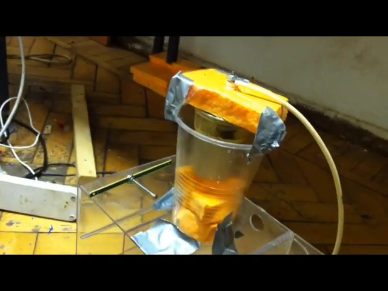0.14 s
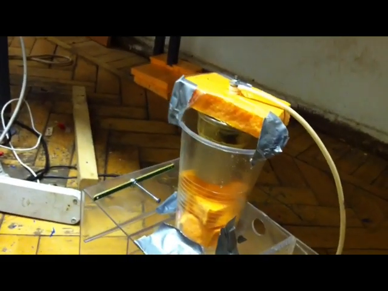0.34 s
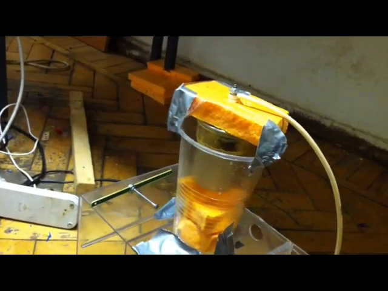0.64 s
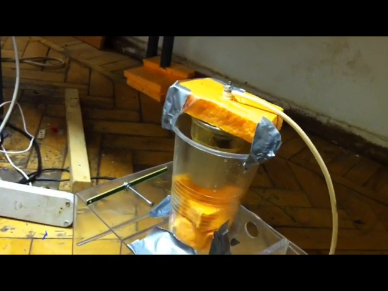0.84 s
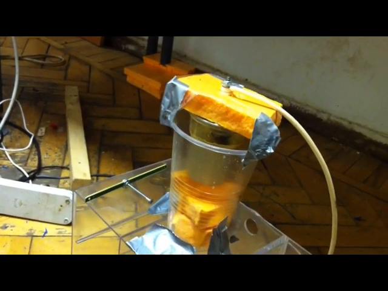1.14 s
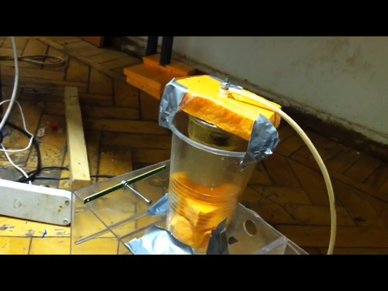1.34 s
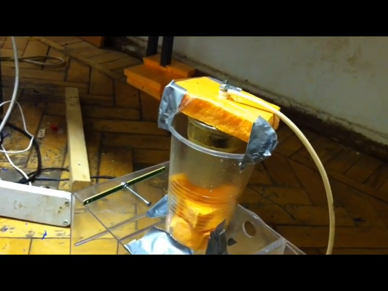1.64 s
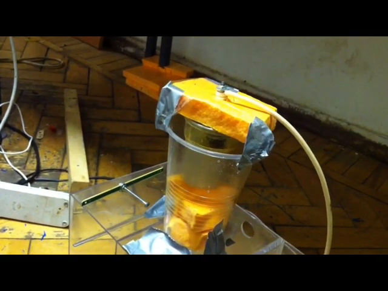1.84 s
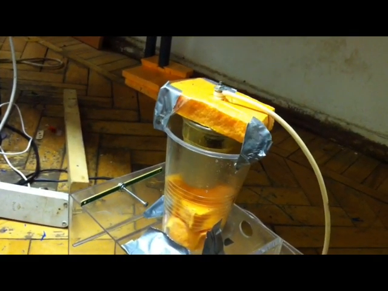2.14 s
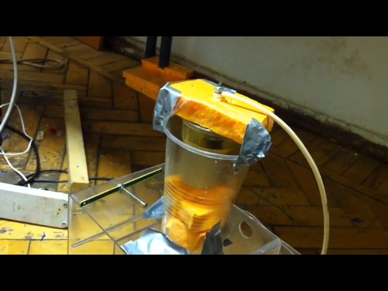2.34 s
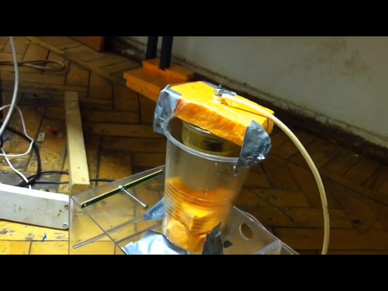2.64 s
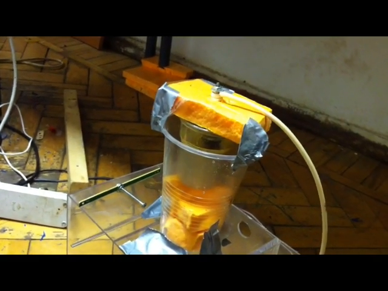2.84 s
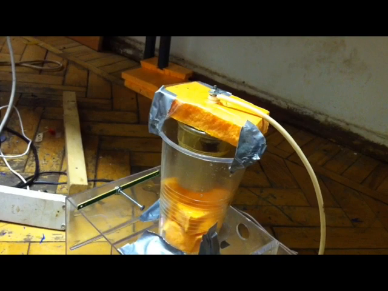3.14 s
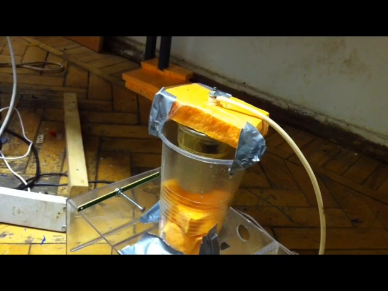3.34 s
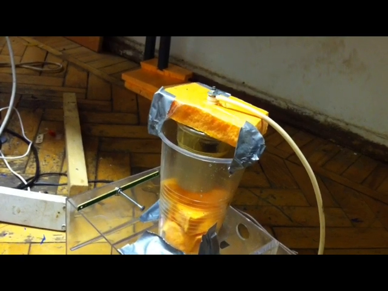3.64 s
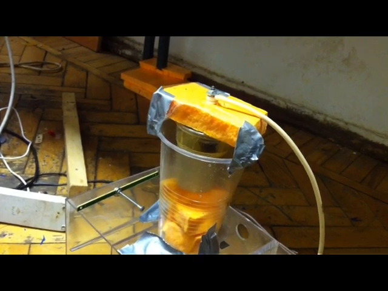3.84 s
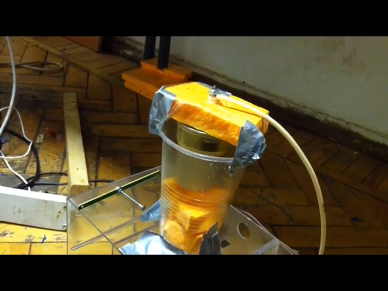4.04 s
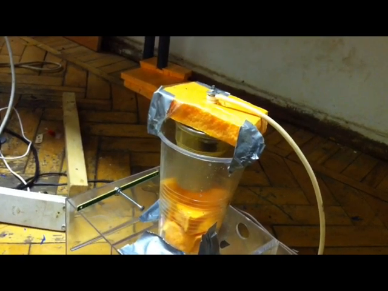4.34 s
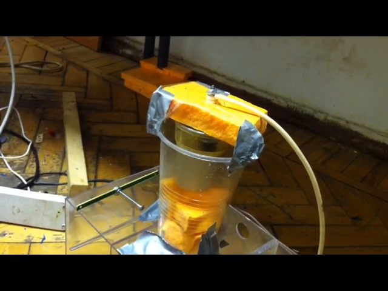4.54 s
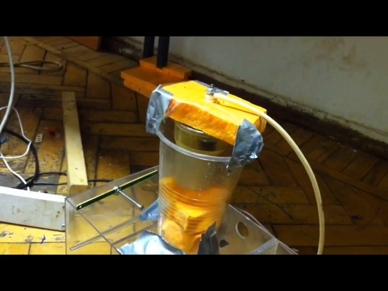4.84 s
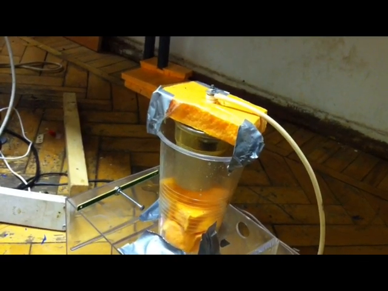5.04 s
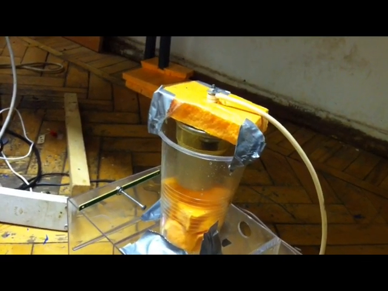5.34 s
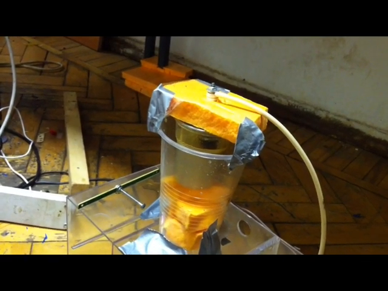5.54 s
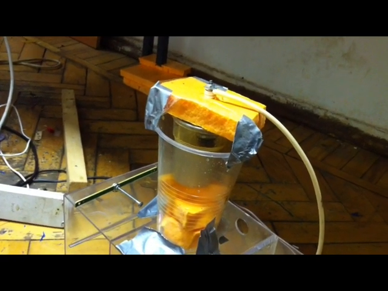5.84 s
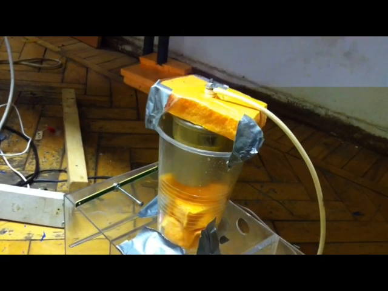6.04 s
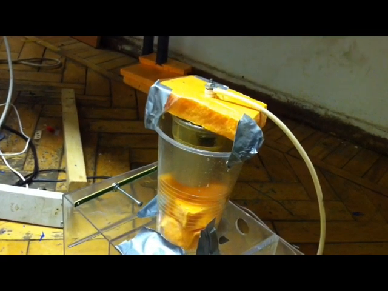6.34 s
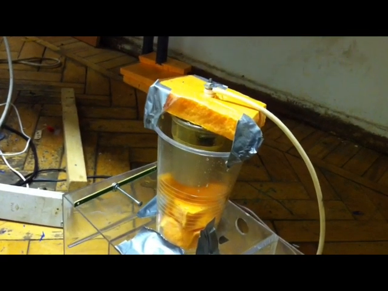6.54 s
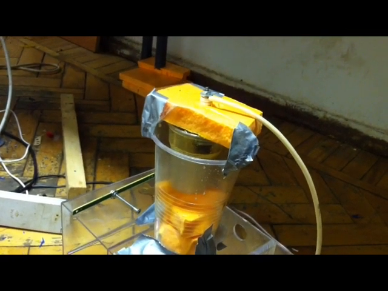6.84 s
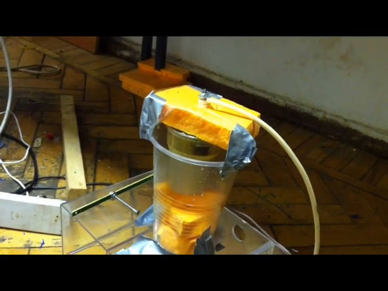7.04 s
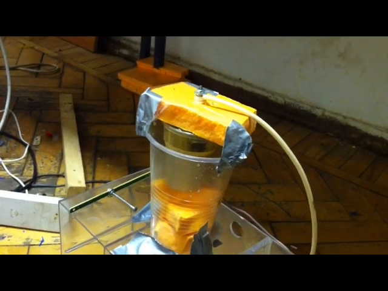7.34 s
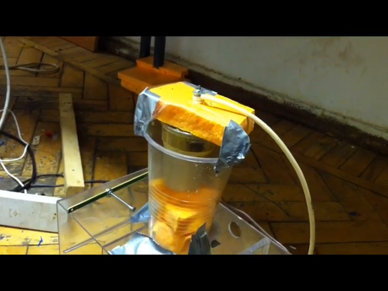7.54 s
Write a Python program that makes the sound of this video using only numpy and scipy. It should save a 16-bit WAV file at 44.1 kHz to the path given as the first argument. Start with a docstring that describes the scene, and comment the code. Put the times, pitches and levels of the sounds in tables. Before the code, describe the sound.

In a small bare workshop, electric arcs explode in a plastic cup of water close to a small, slightly overloaded microphone. Three sharp cracks come at regular intervals, each dying in roughly a third of a second of bright room reverberation. Between them lie low hiss, a very faint mains buzz, a few dry clicks and one short fabric rustle with a soft knock. The last crack has the heaviest cup thump.

```python
"""Workshop floor: electric sparks crack through water in a plastic cup, close to a small microphone.
Sparks are a noise burst plus filtered dense arrivals off floor and walls, with ringing modes of the cup.
Behind them: shaped noise for room air, wavering sines for transformer hum, grainy noise for rubbing cloth,
short rings for ticks. Gain control drops on each crack and recovers slowly."""
import sys
import numpy as np
from scipy import signal
from scipy.io import wavfile
from scipy.ndimage import uniform_filter1d

SR = 44100
rng = np.random.default_rng(int(sys.argv[2]) if len(sys.argv) > 2 else 0)


def generate_wav(sig):
    """Save sig (samples, or channels by samples) to the path in sys.argv[1] as 16-bit PCM at SR."""
    pcm = np.round(np.clip(np.atleast_2d(sig).T, -1, 1) * 32767).astype(np.int16)
    wavfile.write(sys.argv[1], SR, pcm)


N = 338564

# Room and microphone noise spectrum: frequency_hz, relative_db_per_hz
AIR_SPECTRUM = [(20, 3.5), (45, 0), (70, -11.5), (165, 1.5), (250, -6), (400, -9.5), (900, -15),
                (1300, -13.5), (2800, -16.5), (5000, -17.5), (7500, -19), (9300, -18), (12500, -21.5),
                (15300, -17)]
AIR_DB = -66
# Transformer lines on multiples of 100 Hz, one neighbour beating against the third: pitch_hz, level_db
HUM_LINES = [(100, -88), (200, -81), (293, -80), (300, -80), (400, -85), (500, -82), (600, -90), (700, -82),
             (800, -87), (900, -93), (1000, -88), (1300, -89), (1500, -89)]

# Cloth spectrum: frequency_hz, relative_db_per_hz
CLOTH_SPECTRUM = [(100, -3.5), (230, -8), (360, -12), (600, -3), (1200, -10), (1900, -1), (3000, -8),
                  (4700, -4), (6800, -10), (10000, -8), (15700, -16.5)]
# Envelope of one long rub: time_s, level_db
RUB_ENVELOPE = [(4, -69), (4.28, -58.5), (4.41, -53), (4.55, -56.5), (4.62, -60.5), (4.7, -73.5),
                (4.8, -86)]
RUB_TREBLE_DB = -5.5  # over the rub's body
# Sudden cloth slips: start_s, body_db, treble_over_body_db
CLOTH_SLIPS = [(0.287, -76, 13), (4.383, -54.5, -1), (4.421, -52, 5.5), (4.533, -64.5, 10.5)]
SLIP_RISE_S, SLIP_T60_S = 0.0053, 0.34

# Small clicks: start_s, level_db, pitch_hz, t60_s, low_body_db
TICK_EVENTS = [(0.637, -51.5, 5100, 0.006, -51.5), (.6397, -57, 5400, .008, -80),
               (0.8, -50.5, 10900, 0.0075, -74), (1.509, -61, 1960, .03, -85),
               (2.431, -60, 2320, .015, -80), (2.5172, -48, 5600, .003, -80), (2.699, -53, 1710, .006, -66),
               (2.707, -59, 1600, .008, -80), (2.72, -61, 1900, .008, -80)]
# One soft knock under the long rub: start_s, level_db, pitch_hz, t60_s
KNOCK = (4.39, -60, 150, .1)

# Sparks, the first before time zero: start_s, shock_db, cup_thump_db
SPARK_EVENTS = [(-.17, -3.5, -20), (1.8732, -5.5, -17), (4.0214, -4.5, -8), (6.1689, -3.5, -0.5)]
# Shock spectrum passed on by the room: frequency_hz, relative_db_per_hz
SHOCK_SPECTRUM = [(60, -22.5), (150, -15.5), (300, -14), (550, -7), (880, -4.5), (1220, -19.5),
                  (1500, -7.5), (1950, -11.5), (3200, -13.5), (4700, -7.5), (6300, -6.5), (7300, -15),
                  (8700, -1), (15500, -2)]
# Direct arc spectrum: frequency_hz, relative_db_per_hz
CRACK_SPECTRUM = [(100, -22), (400, -1), (900, -3), (1200, -7), (2000, -2.5), (3500, -9), (7000, -11),
                  (15000, -12)]
# Room decay: frequency_hz, t60_s
ROOM_DECAY = [(100, .1), (200, .26), (500, .33), (900, .3), (1400, .34), (2300, .34), (3400, .34),
              (5500, .32), (7800, .27), (10500, .25), (14600, .22)]
# Slower echo of the middle band: frequency_hz, level_db
LINGER_LEVEL = [(1000, -39.5), (1350, -15.5), (2600, -13), (3200, -18), (4500, -21.5), (7000, -44.5)]
LINGER_T60_S = .62
# Low modes of the cup: pitch_hz, level_over_thump_db, t60_s
CUP_MODES = [(219, -0.5, 0.033), (267, -5, .04), (518, 2.5, 0.022), (750, -11.5, 0.15), (825, -10, 0.051)]
# Air in the cup above the water: pitch_hz, level_over_shock_db, t60_s
MOUTH_MODES = [(1600, 7, 0.0054), (1486, -23, 0.38), (1564, -21, 0.34)]
# Scattered energy: near group from cup and floor, a lull, then the walls
NEAR_DB, NEAR_RISE_S, NEAR_ENDS_S, LULL_DB = 0, .0008, .006, -5
WALLS_FULL_AT_S, WALLS_RISE_S, WALLS_SETTLE_S = .0165, 0.0044, 0.03
WALLS_FIRST_DB, WALLS_DB = 6, 1

EDGE_HZ, SHELF_HZ = 17000, 15750  # upper limits of the sound's band


def amp(db):
    """Decibels to amplitude ratio."""
    return 10 ** (np.asarray(db) / 20)


def evened(x):
    """Scale to rms 1."""
    return x / np.sqrt(np.mean(x ** 2) + 1e-20)


def read(points, hz):
    """Interpolate a table over log frequency."""
    f, value = np.transpose(points)
    return np.interp(np.log(hz + 1), np.log(f + 1), value)


def add(mix, start_s, sound):
    """Add a sound in place, trimmed to the mix."""
    at = round(start_s * SR)
    part = mix[max(at, 0):][:len(sound) + min(at, 0)]
    part += sound[max(-at, 0):][:len(part)]


def low_pass(x, hz):
    """Linear-phase low-pass without delay."""
    taps = signal.firwin(511, hz, window=("kaiser", 9), fs=SR)
    return signal.oaconvolve(x, taps, "same")


def colour(x, points):
    """Causal minimum-phase filter: the phase follows from the log gain."""
    hz = abs(np.fft.fftfreq(8192, 1 / SR))
    log_gain = np.log(amp(np.maximum(read(points, hz), -60)))
    spectrum = np.exp(np.conj(signal.hilbert(log_gain)))
    taps = np.fft.ifft(spectrum).real[:4096]
    return signal.oaconvolve(x, taps / np.linalg.norm(taps))[:len(x)]


def ring(pitch_hz, level_db, t60_s, size=8000):
    """One mode: an exponentially decaying sine."""
    t = np.arange(size) / SR
    return amp(level_db - 60 * t / t60_s) * np.sin(2 * np.pi * pitch_hz * t)


def drift(rate_hz, size):
    """Random wander up to rate_hz, rms 1: sines of random phase on a 64-sample grid."""
    t = np.arange(0, size + 64, 64) / SR
    rates_hz = np.geomspace(rate_hz / 20, rate_hz, 16)
    wander = sum(np.sin(2 * np.pi * (f * t + rng.random())) / np.sqrt(f) for f in rates_hz)
    return np.interp(np.arange(size) / SR, t, evened(wander))


def air(lumpy_db=2.0, lumps_below_hz=350):
    """Room and microphone noise; the low end comes in lumps."""
    hiss = evened(colour(rng.standard_normal(N), AIR_SPECTRUM))
    low = signal.sosfilt(signal.butter(2, lumps_below_hz, fs=SR, output="sos"), hiss)
    lumps = amp(lumpy_db * drift(4.6, N)) - 1
    return amp(AIR_DB) * (hiss + low * lumps)


def hum(waver_db=0.5):
    """Transformer harmonics as sines, each wavering on its own."""
    t = np.arange(N) / SR
    out = np.zeros(N)
    for pitch_hz, level_db in HUM_LINES:
        level = np.sqrt(2) * amp(level_db + waver_db * drift(4.3, N))
        out += level * np.sin(2 * np.pi * (pitch_hz * t + rng.random()))
    return out


def ticks(body_hz=330, body_t60_s=0.033, snap_db=8):
    """Small clicks: a short ring, with a snap and a dull tap that follow the body level."""
    out = np.zeros(N)
    for start_s, level_db, pitch_hz, t60_s, body_db in TICK_EVENTS:
        add(out, start_s, ring(pitch_hz, level_db, t60_s, size=2000))
        add(out, start_s, ring(body_hz, body_db, body_t60_s, size=2000))
        add(out, start_s, amp(body_db + snap_db) * np.hanning(7))
    start_s, level_db, pitch_hz, t60_s = KNOCK
    add(out, start_s, ring(pitch_hz, level_db, t60_s))
    return out


def rustle(grain_db=4.5, clump_db=0.5, split_hz=6500):
    """Cloth friction as clumped noise grains: one long rub, and sudden slips that die away."""
    t = np.arange(N) / SR
    grains = rng.standard_normal(N) * amp(grain_db * rng.standard_normal(N))
    rub = colour(grains, CLOTH_SPECTRUM)
    body = low_pass(rub, split_hz)
    treble = evened(rub - body) * amp(clump_db * drift(210.0, N))
    swell = amp(np.interp(t, *np.transpose(RUB_ENVELOPE), -200, -200))
    body_power = swell ** 2
    treble_power = (swell * amp(RUB_TREBLE_DB)) ** 2
    for start_s, body_db, treble_db in CLOTH_SLIPS:
        rise = np.clip((t - start_s) / SLIP_RISE_S, 0, 1)
        slip = rise * amp(body_db - 60 * np.maximum(t - start_s, 0) / SLIP_T60_S)
        body_power = body_power + slip ** 2
        treble_power = treble_power + (slip * amp(treble_db)) ** 2
    return evened(body) * np.sqrt(body_power) + treble * np.sqrt(treble_power)


def reflections(spread_db=3.0, size=28000):
    """Dense arrivals of uneven size, rms 1."""
    return evened(rng.standard_normal(size) * amp(spread_db * rng.standard_normal(size)))


def scatter(t):
    """Arrival gain over time: a near group, a lull, then the walls, strongest at first."""
    near = amp(NEAR_DB) * np.exp(-(t / NEAR_ENDS_S) ** 4) + amp(LULL_DB)
    settle = np.exp(-np.maximum(t - WALLS_FULL_AT_S, 0) / WALLS_SETTLE_S)
    walls = amp(WALLS_DB + (WALLS_FIRST_DB - WALLS_DB) * settle)
    wall_share = np.clip((t - WALLS_FULL_AT_S) / WALLS_RISE_S + 1, 0, 1)
    onset = np.minimum(t / NEAR_RISE_S, 1) ** 2
    return onset * (near * (1 - wall_share) + walls * wall_share)


def room_decay(paths):
    """Arrivals die at each band's own rate; the middle band also lingers."""
    hz, t, bands = signal.stft(paths, SR, nperseg=256)
    main = amp(-60 * t / read(ROOM_DECAY, hz)[:, None])
    linger = amp(read(LINGER_LEVEL, hz)[:, None] - 60 * t / LINGER_T60_S)
    return signal.istft(bands * (main + linger), SR, nperseg=256)[1]


def spark(room, shock_db, thump_db, same=0.44, crack_db=3.5, crack_t60_s=0.033, small_hz=135):
    """Shock by the room's paths, partly new per arc as each takes another way through the water."""
    paths = room_decay(same * room + np.sqrt(1 - same ** 2) * reflections())
    t = np.arange(len(paths)) / SR
    out = amp(shock_db) * colour(paths * scatter(t), SHOCK_SPECTRUM)
    crack = reflections()[:2000] * amp(shock_db + crack_db - 60 * t[:2000] / crack_t60_s)
    add(out, .0006, colour(crack, CRACK_SPECTRUM))
    mouth = sum(ring(*mode, size=16000) for mode in MOUTH_MODES)
    add(out, 0, amp(shock_db) * mouth)
    for pitch_hz, level_db, t60_s in CUP_MODES:
        add(out, .0015, ring(pitch_hz * rng.uniform(0.98, 1.03), level_db + thump_db, t60_s, size=8000))
    # a small cup radiates no deep bass
    return signal.sosfilt(signal.butter(3, small_hz, "high", fs=SR, output="sos"), out)


def sparks():
    """All arcs share one room."""
    out, room = np.zeros(N), reflections()
    for start_s, shock_db, thump_db in SPARK_EVENTS:
        add(out, start_s, spark(room, shock_db, thump_db))
    return out


def scene():
    """Sum of all layers, one channel."""
    return (air() + hum() + ticks() + rustle() + sparks())[None]


def record(dry, knee_db=-40, slope=0.16, recover_db_per_s=5.0, still_down_db=4.0, bass_hz=130, top_db=-30):
    """Bass is cut and the band ends at the top; gain drops at once on loud sound, creeps back; peaks saturate."""
    x = signal.sosfilt(signal.butter(2, bass_hz, "high", fs=SR, output="sos"), dry[0])
    power_db = 10 * np.log10(abs(uniform_filter1d(x ** 2, 400)) + 1e-12)
    cut_db = slope * np.maximum(power_db - knee_db, 0)
    cut_db[0] = still_down_db  # from the spark before time zero
    recovery_db = np.arange(N) * recover_db_per_s / SR
    cut_db = np.maximum.accumulate(cut_db + recovery_db) - recovery_db
    x = .82 * np.tanh(x / amp(cut_db) / .82)
    dull = low_pass(x, SHELF_HZ)
    shelved = dull + amp(top_db) * (x - dull)  # little sound above the shelf
    return low_pass(shelved, EDGE_HZ)[None]


dry = scene()
out = record(dry)
generate_wav(out)
```